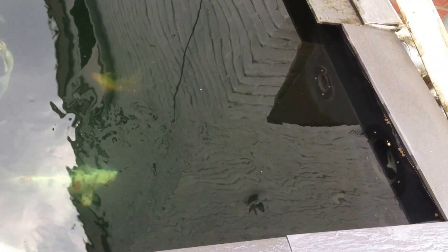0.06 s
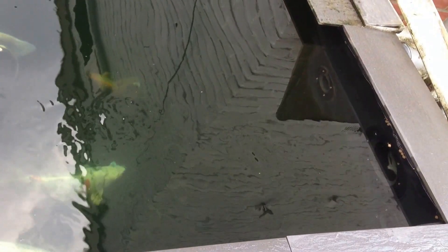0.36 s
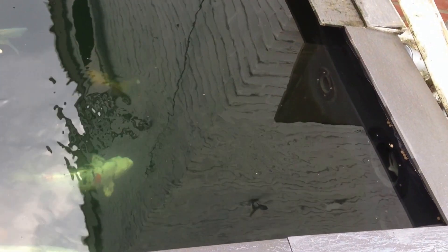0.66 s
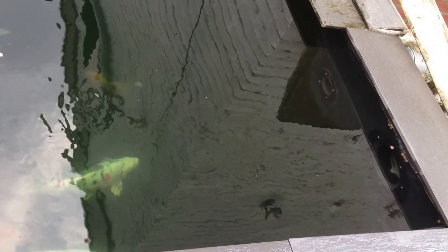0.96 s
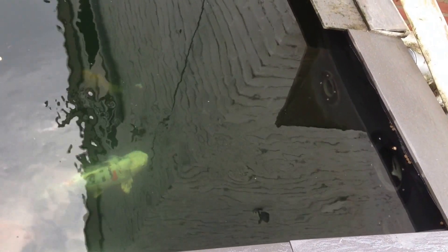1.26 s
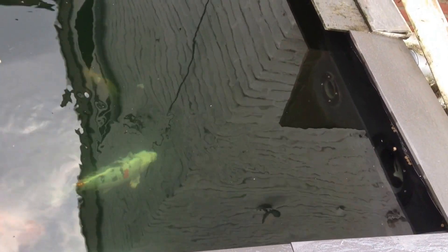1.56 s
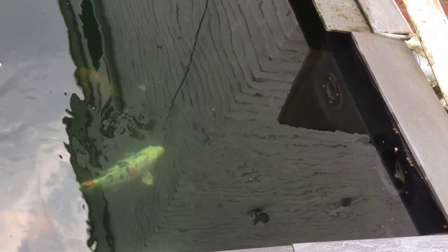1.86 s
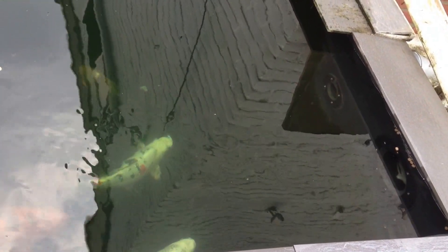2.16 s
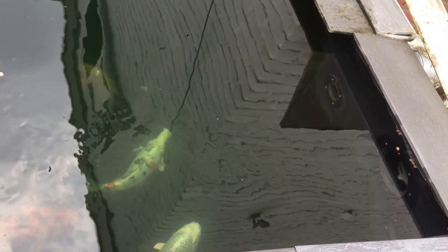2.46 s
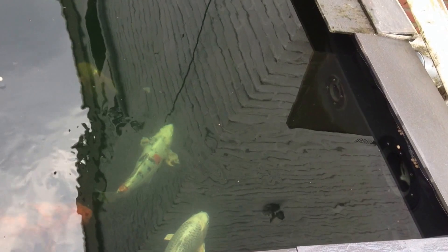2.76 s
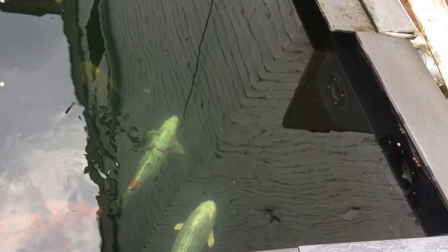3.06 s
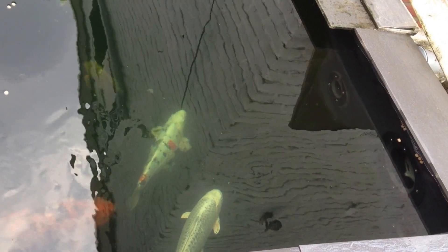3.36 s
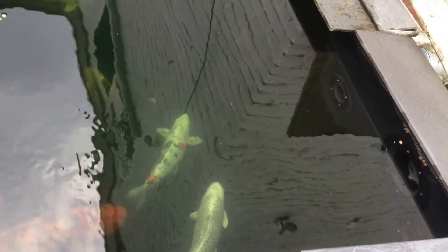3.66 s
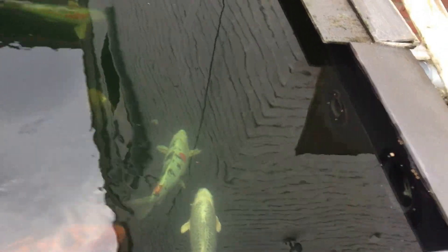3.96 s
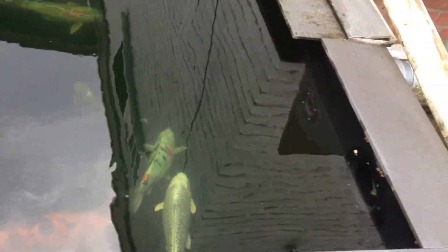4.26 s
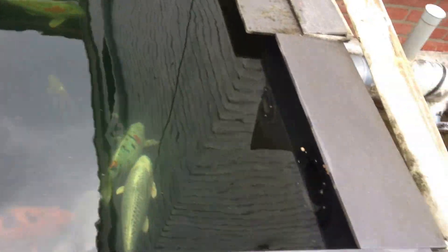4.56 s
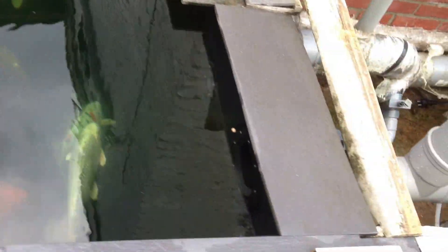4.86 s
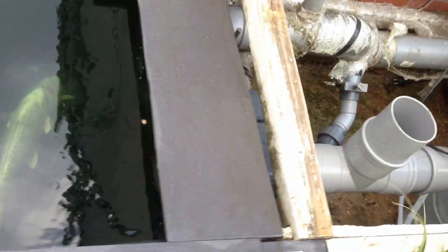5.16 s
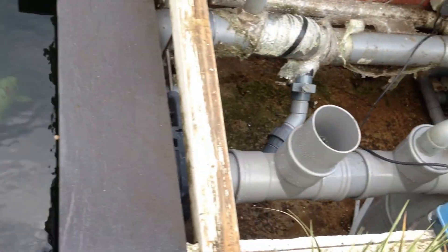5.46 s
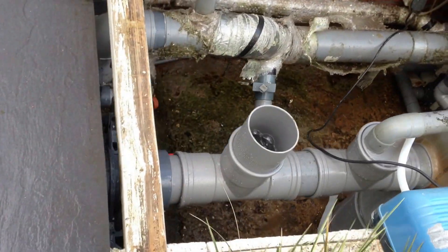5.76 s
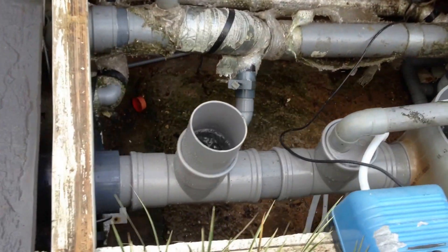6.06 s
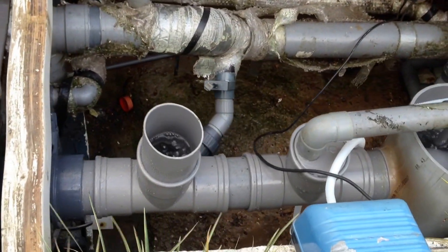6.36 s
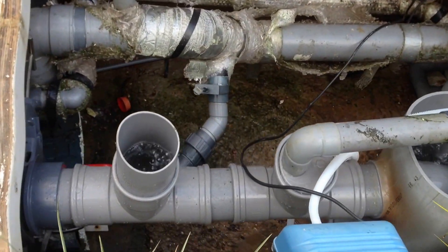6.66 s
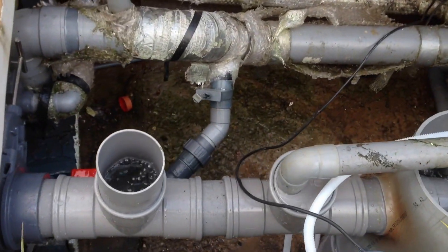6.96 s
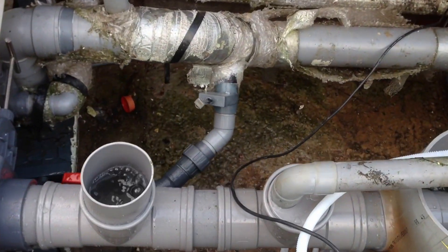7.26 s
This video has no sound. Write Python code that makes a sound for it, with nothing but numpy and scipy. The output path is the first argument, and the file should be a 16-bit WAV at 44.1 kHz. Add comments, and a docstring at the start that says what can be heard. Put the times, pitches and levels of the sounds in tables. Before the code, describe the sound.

Water bubbles and gurgles in an open pipe over a trickle and faint pump hum, then a breeze buffets the microphone.

```python
"""Gurgling pond filter in a breeze

In a garden, close to a pond filter, on a phone's mono microphone. A pump hums and water trickles behind
the gurgle of bubbles that ring the open stand-pipe. The trickle brightens as the phone turns towards the
pipework; from about 4 s a breeze buffets the microphone with dull, fluttering thumps."""
import sys
import numpy as np
from scipy import signal
from scipy.fft import rfft, irfft
from scipy.io import wavfile
from scipy.ndimage import map_coordinates

SR = 44100
rng = np.random.default_rng(int(sys.argv[2]) if len(sys.argv) > 2 else 0)


def to_wav(sig):
    """Store sig (one row per channel, or 1-D mono) as 16-bit WAV at the path in sys.argv[1].

    Samples outside -1..1 are clipped; the rate is SR.
    """
    pcm = np.clip(np.atleast_2d(sig), -1, 1) * 32767
    pcm = np.round(pcm).astype(np.int16)
    wavfile.write(sys.argv[1], SR, pcm.T)  # frames by channels


N = 327222
T = np.arange(N) / SR

# gusts at the microphone: start/s, hold/s, relative level/dB
WIND_GUSTS = [(4.105, 0.071, -45.5), (4.615, 0.023, -36), (4.686, 0.023, -30), (4.73, 0.094, -38.5),
              (4.838, 0.055, -28), (4.90, 0.048, -32.5), (5.15, 0.15, -47.5), (5.488, 0.037, -36),
              (5.69, 0.076, -40), (5.87, 0.094, -45), (6.582, .034, -39), (6.80, 0.16, -43)]
GUST_ATTACK_S, GUST_RELEASE_S = 0.008, 0.017


def undb(db):
    """Decibels to gain."""
    return 10 ** (np.asarray(db) / 20)


def unit(x):
    """Scale to rms 1."""
    return x / np.sqrt(np.mean(x ** 2))


def columns(table):
    """The columns of a table, each standing upright: one row per event."""
    return np.array(table, float).T[:, :, None]


def place(start_s, sounds):
    """Mix short sounds, one a row, each from its own start."""
    at = np.round(start_s * SR).astype(int) + np.arange(sounds.shape[1])
    return np.bincount(np.clip(at + 1, 0, N + 1).ravel(), sounds.ravel(), N + 2)[1:-1]


def colour(x, points):
    """Shape a sound by (f/Hz, gain/dB) points."""
    hz, db = np.transpose(points)
    f = np.maximum(np.fft.rfftfreq(N, 1 / SR), 1)
    return irfft(rfft(x) * undb(np.interp(np.log(f), np.log(hz), db)), N)


def resonate(x, hz, width_hz):
    """One resonance, gain 1 at its centre, Q at least 1."""
    return signal.lfilter(*signal.iirpeak(hz, max(hz / width_hz, 1), fs=SR), x)


def drift(rate_hz):
    """Random drift with a spread near 1."""
    knots = rng.standard_normal(2048)
    return np.interp(T * rate_hz, np.arange(len(knots)), knots)


def swells(table, attack_s, release_s):
    """Envelope of events that rise, hold and die away; overlaps add in power."""
    start, hold, db = columns(table)
    away = np.maximum(start - T, 0) / attack_s + np.maximum(T - start - hold, 0) / release_s
    envelopes = undb(db) * np.exp(-np.minimum(away, 20))
    return np.sqrt(np.sum(envelopes ** 2, axis=0))


def pump(waver_db=2.3):
    """The pump hums in the background on harmonics of 50 Hz mains, each wavering in level."""
    # mains harmonics: f/Hz, level/dB
    hum = [(250, -65), (300, -70), (350, -73), (450, -81.5)]
    return sum(np.sqrt(2) * undb(db + waver_db * drift(13)) * np.sin(2 * np.pi * (hz * T + rng.random()))
               for hz, db in hum)


def bubble(hz, cycles, glide, size):
    """A bubble swells for some cycles, rings down and rises in pitch as it nears the surface."""
    age = T[:size] * hz / cycles
    return age * np.exp(1 - age) * np.sin(2 * np.pi * cycles * (age + glide * age ** 2 / 2))


def bubble_cloud(low_hz, high_hz, cycles, spread_db, count, size):
    """Bubbles of all sizes at random moments: many faint, a few strong."""
    when, smallness, luck = columns(rng.random((count, 3)))
    gain = undb(-spread_db * np.log(np.maximum(luck, np.exp(-4))))
    hz = low_hz * (high_hz / low_hz) ** smallness
    return unit(place(when * T[-1], gain * bubble(hz, cycles, glide=0.027, size=size)))


def stream(grain=0.45, flicker_db=1, droplet_db=-17):
    """Running water: tiny bubbles over a soft wash, fine droplets and a hiss of spray on top."""
    # flow as the microphone turns to it: t/s, relative trickle level/dB, relative spray level/dB
    flow = [(0.0, -61.5, -70.5), (1.36, -61, -68.5), (3.62, -61, -69.5), (5.41, -56.5, -68),
            (6.96, -55.5, -65.5), (7.42, -57, -66.5)]
    # spectrum of running water: f/Hz, gain/dB
    trickle_spectrum = [(40, -15), (85, -12), (135, 4), (300, 2.5), (520, 1), (760, -1), (1150, 0.5),
                        (1750, -2.5), (2400, -8), (3700, -12), (5000, -31), (7000, -24), (15000, -49)]
    # spectrum of fine spray: f/Hz, gain/dB
    spray_spectrum = [(1500, -9), (4000, 4), (6500, -3), (9500, -3), (12000, -4.5), (15500, -6)]
    fizz = bubble_cloud(low_hz=786, high_hz=5210, cycles=2.76, spread_db=4, count=2400, size=600)
    wash = rng.standard_normal(N) * undb(flicker_db * drift(14))
    trickle = unit(unit(colour(wash, trickle_spectrum)) + grain * unit(colour(fizz, trickle_spectrum)))
    droplets = bubble_cloud(low_hz=2600, high_hz=12500, cycles=1.3, spread_db=3.5, count=800, size=200)
    spray = unit(colour(rng.standard_normal(N), spray_spectrum))
    times, trickle_db, spray_db = np.transpose(flow)
    trickle_gain = undb(np.interp(T, times, trickle_db) + 1)
    spray_gain = undb(np.interp(T, times, spray_db) + 3.5)
    return (trickle + undb(droplet_db) * droplets) * trickle_gain + spray * spray_gain


def spatter(rise_s=0.0052, gain_db=4):
    """Droplets land softly and tick on the plastic."""
    # droplets: t/s, relative level/dB, centre f/Hz, t60/s, width as a share of the centre
    drops = [(3.968, -48.5, 3580, .035, 0.66), (4.64, -68, 5500, 0.62, 1), (4.929, -40, 6400, 0.021, 0.79),
             (4.934, -55, 3820, 0.072, 1), (5.433, -44, 8200, .012, .55), (5.868, -50, 9300, .025, .7),
             (6.063, -38, 9550, 0.015, 0.2), (6.119, -52.5, 7000, 0.065, 0.99),
             (6.806, -44, 4380, 0.027, 1)]
    t = T[:8000]
    start, db, hz, t60, width = columns(drops)
    ticks = [unit(resonate(resonate(rng.standard_normal(len(t)), f, band), f, band))
             for f, band in zip(hz.ravel(), (width * hz).ravel())]
    envelope = (1 - np.exp(-t / rise_s)) * np.exp(-np.log(1000) * t / t60)
    return place(start, undb(db + gain_db) * np.array(ticks) * envelope)


def eddy(hz, turn, swings, size):
    """Pressure of a passing vortex: it swells and fades over a few swings of uneven length."""
    age = np.clip((T[:size] - size / 2 / SR) * hz / swings, -6, 6)
    uneven = 0.06 * np.sin(1.5 * age + 14 * np.pi * turn) - 0.025 * age ** 2
    envelope = np.exp(-age ** 2 / 2) * signal.windows.tukey(size)
    return envelope * np.cos(2 * np.pi * (swings * age + uneven + turn))


def buffets(edge_top_hz=720, full_flurry_s=0.0049, scatter=0.58, count=6, size=1300):
    """Each buffet is one strong vortex with a quick leading edge, in a flurry of weaker ones."""
    # vortices that strike the microphone: t/s, core level/dB, length/s, centre f/Hz
    strikes = [(4.114, -29.5, 0.0073, 290), (4.143, -23, 0.0077, 220), (4.153, -24, 0.0078, 308),
               (4.512, -26.5, 0.012, 285), (4.612, -24, 0.0018, 660), (4.613, -9, 0.0034, 337),
               (4.624, -23, 0.0076, 338), (4.683, -21.5, 0.0063, 710), (4.698, -19.5, 0.009, 574),
               (4.708, -24, .008, 530), (4.720, -25.5, 0.0078, 191), (4.743, -26, 0.013, 253),
               (4.757, -25.5, 0.0074, 460), (4.773, -16, 0.007, 540), (4.797, -20.5, 0.0094, 222),
               (4.833, -21, 0.0065, 520), (4.843, -16.5, 0.0092, 490), (4.859, -9.5, 0.0068, 470),
               (4.868, -21, 0.0067, 345), (4.882, -16.5, 0.0071, 447), (4.888, -21, 0.0081, 186),
               (4.901, -28, 0.0056, 480), (4.931, -17.5, 0.0093, 526), (5.079, -34, 0.0079, 206),
               (5.094, -28, 0.0055, 370), (5.169, -24.5, 0.011, 320), (5.265, -26.5, 0.006, 430),
               (5.434, -30, 0.0068, 380), (5.480, -28, 0.0062, 395), (5.492, -28, 0.0057, 420),
               (5.500, -26, 0.0055, 258), (5.507, -21, 0.0081, 550), (5.607, -34, 0.012, 297),
               (5.636, -33.5, 0.013, 198), (5.691, -30, 0.0056, 380), (5.713, -31, 0.0072, 367),
               (5.731, -28, 0.0094, 290), (5.755, -30, 0.0064, 328), (5.765, -34, 0.0073, 220),
               (5.797, -30, 0.0068, 340), (5.872, -29.5, 0.0058, 400), (5.879, -24.5, 0.0088, 228),
               (5.912, -30, 0.0072, 334), (5.945, -33.5, 0.0098, 250), (6.053, -29, 0.0058, 376),
               (6.060, -31, 0.0076, 201), (6.1865, -10.5, 0.0055, 347), (6.294, -31.5, 0.0094, 233),
               (6.377, -35, 0.0094, 256), (6.424, -39.5, 0.0097, 218), (6.564, -27.5, 0.0093, 280),
               (6.577, -22.5, 0.007, 255), (6.588, -19.5, 0.00896, 306), (6.604, -24, 0.008, 450),
               (6.617, -30, .007, 300), (6.654, -24, 0.013, 294), (6.680, -23.5, 0.0062, 310),
               (6.756, -38.5, 0.0094, 225), (6.803, -34, .011, 387), (6.836, -29.5, 0.013, 416),
               (6.871, -24, 0.0045, 288), (6.891, -29.5, 0.011, 290), (6.916, -34, 0.0072, 230),
               (6.934, -21.5, 0.016, 268), (7.133, -39, 0.0082, 213)]
    when, db, length, hz = columns(strikes)
    start = when - size / 2 / SR
    gain = undb(db)
    draws = rng.random((len(when), count, 3))
    swings = np.minimum(0.23 * length * hz, 0.95)  # a vortex breaks up after about one swing
    core = eddy(hz, rng.random(when.shape), swings, size)
    edge = eddy(np.minimum(1.836 * hz, edge_top_hz), rng.random(when.shape), swings=0.93, size=size)
    pressure = place(start, gain * core) + place(start - 0.249 * length, 0.33 * gain * edge)
    flurry_gain = 0.29 * gain * np.minimum(length / full_flurry_s, 1) ** 2
    for k in range(count):
        lag, smallness, turn = columns(draws[:, k])
        offset = 2 * (k + lag) / count - 1
        flurry = eddy(hz * np.exp(scatter * (2 * smallness - 1)), turn, swings=0.67, size=size)
        pressure += place(start + offset * length, flurry_gain * np.sqrt(abs(offset)) * flurry)
    return pressure


def breeze(mid_hz=330, mid_db=-44, db_per_octave=28, scatter=0.65, flutter_db=2, top_hz=850, gain_db=-3):
    """Small vortices rush between the buffets; a stronger gust sweeps them past faster."""
    # light air that keeps moving between gusts: start/s, hold/s, relative level/dB
    light_air = [(4.516, 2.5, -52)]
    force = swells(WIND_GUSTS + light_air, GUST_ATTACK_S, GUST_RELEASE_S) * undb(flutter_db * drift(35))
    position, smallness, strength, turn = columns(rng.random((3400, 4)))
    first_s = WIND_GUSTS[0][0] - 20 * GUST_ATTACK_S
    when = first_s + position * (T[-1] - first_s)
    force_db = 20 * np.log10(np.interp(when, T, force))
    centre_hz = np.maximum(mid_hz * 2 ** ((force_db - mid_db) / db_per_octave), 220)
    hz = centre_hz * np.exp(scatter * (2 * smallness - 1))
    flutter = place(when, undb(3 * strength) * eddy(hz, turn, swings=0.57, size=700))
    # the smallest vortices cancel out across the microphone port
    flutter = signal.sosfilt(signal.butter(3, top_hz, fs=SR, output="sos"), flutter)
    return unit(flutter) * force * undb(gain_db)


def wind(cut_hz=98, rumble_hz=60, rumble_db=-33):
    """Wind right on the microphone: the low cut thins it, rings briefly and lets a faint rumble by."""
    low_cut = signal.butter(4, cut_hz, "high", fs=SR, output="sos")
    pressure = signal.sosfilt(low_cut, buffets() + breeze())
    ring = 0.9 * resonate(pressure, hz=160, width_hz=85)
    rumble = unit(resonate(resonate(rng.standard_normal(N), rumble_hz, rumble_hz), rumble_hz, rumble_hz))
    rumble *= swells(WIND_GUSTS, GUST_ATTACK_S, GUST_RELEASE_S) * undb(rumble_db)
    return pressure + ring + rumble


def plinks(cycles=3.8, splash_db=-10, scatter=0.05, count=10):
    """A bubble rings briefly and breaks into a splashy tail of weaker ones near its pitch."""
    # single ringing bubbles: t/s, level/dB, f/Hz, tail/s
    ringing = [(4.016, -44, 1240, 0.036), (4.969, -43.5, 1710, 0.008), (6.129, -44, 2310, 0.009)]
    when, db, hz, tail = columns(ringing)
    first = place(when - cycles / hz, undb(db) * bubble(hz, cycles, glide=0.0044, size=2000))
    when, db, hz, tail = columns(np.repeat(ringing, count, axis=0))
    lag, smallness = columns(rng.random((len(when), 2)))
    splash = bubble(hz * np.exp(scatter * (2 * smallness - 1)), cycles, glide=0.008, size=2000)
    splash_gain = undb(db + splash_db) * np.sqrt(tail / tail.max())
    return first + place(when + lag * tail, splash_gain * splash)


def pipe(water):
    """The air column in the open pipe rings with whatever the water does."""
    # air column resonances: f/Hz, width/Hz, gain/dB
    modes = [(182, 42, 3.5), (359, 27, -4.5), (736, 60, -2), (1150, 82, -3.5)]
    return sum(undb(db) * resonate(water, hz, width) for hz, width, db in modes)


def slops(cycles=1.645, scatter=0.296, hollow=0.22, count=80):
    """Each slop traps a swarm of small bubbles, coloured by the hollow pipe."""
    # water slopping against the pipe wall: t/s, relative level/dB, bubble f/Hz, length/s
    wall_slops = [(.125, -59.5, 940, .035), (.825, -54.5, 1150, 0.045), (1.42, -59.5, 895, 0.045),
                  (2.004, -57, 1050, 0.028), (2.693, -56, 1030, 0.011), (2.773, -57.5, 874, 0.037),
                  (3.974, -51, 1214, 0.007), (4.40, -68, 2300, 0.4), (4.945, -57.5, 2930, 0.038),
                  (5.30, -60, 2530, 0.052), (5.35, -55, 1850, 0.029), (6.80, -53.5, 1240, 0.081),
                  (6.865, -55.5, 1910, 0.056), (7.31, -57.5, 1380, 0.15)]
    when, db, hz, length = columns(np.repeat(wall_slops, count, axis=0))
    lag, smallness = columns(rng.standard_normal((len(when), 2)))
    gain = undb(db) * np.sqrt(length * hz / cycles / count)
    bubbles = bubble(hz * np.exp(scatter * smallness), cycles, glide=0.019, size=1200)
    swarm = place(when + 0.32 * lag * length - cycles / hz, gain * bubbles)
    return swarm + hollow * pipe(swarm)


def sway(x, share, rate_hz):
    """The water level rises and falls, and the pitch of the air column moves with it."""
    return map_coordinates(x, [np.cumsum(1 + share * drift(rate_hz))], mode="mirror")


def gurgle(churn_db=-2, simmer_db=-62.5, glug_db=-5.5, glug_cycles=1.64, cut_hz=130):
    """Churning bubbles ring the stand-pipe in surges; now and then a large air pocket glugs."""
    # water heaving in the pipe: start/s, hold/s, relative level/dB
    surges = [(.29, 0.13, -51), (1.07, 0.4, -55), (1.69, 0.063, -53), (1.98, 0.1, -50.5),
              (2.43, 0.079, -54.5), (2.73, 0.16, -52.5), (3.19, 0.094, -49), (3.52, 0.15, -52.5),
              (3.83, 0.11, -52.5), (7.25, 0.094, -49.5)]
    # air pockets breaking loose: t/s, relative level/dB, f/Hz
    pockets = [(1.092, -38, 183), (1.252, -44, 198), (1.418, -41.5, 195), (1.957, -40.5, 196),
               (2.19, -40.5, 170), (2.459, -39, 180), (2.759, -42.5, 355), (2.861, -38.5, 181),
               (3.195, -38, 194), (3.568, -31.5, 190), (4.3, -36.5, 305), (7.259, -32, 178),
               (7.323, -33, 336)]
    bubbles = bubble_cloud(low_hz=195.5, high_hz=1810, cycles=0.42, spread_db=3.5, count=3000, size=400)
    churn = unit(sway(pipe(bubbles), share=0.035, rate_hz=4))
    heave = np.hypot(swells(surges, attack_s=0.035, release_s=0.036), undb(simmer_db))
    when, db, hz = columns(pockets)
    rings = bubble(hz, glug_cycles, glide=0.0013, size=3000)
    glugs = place(when - glug_cycles / hz, undb(db + glug_db) * rings)
    mouth = signal.butter(3, cut_hz, "high", fs=SR)  # the narrow mouth radiates little bass
    return signal.lfilter(*mouth, churn * heave * undb(churn_db) + glugs)


def scene():
    """Water close by, the pump behind it and wind on the microphone, in mono."""
    return (gurgle() + slops() + plinks() + spatter() + stream() + pump() + wind())[None]


def record(dry):
    """The phone cuts the top steeply above 15.2 kHz."""
    return signal.sosfilt(signal.ellip(10, 0.2, 70, 15230, fs=SR, output="sos"), dry)


dry = scene()
out = record(dry)
to_wav(out)
```